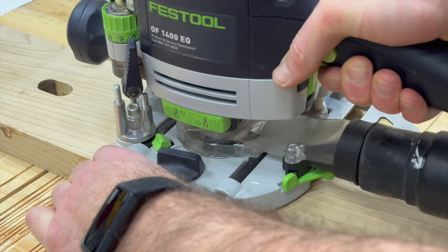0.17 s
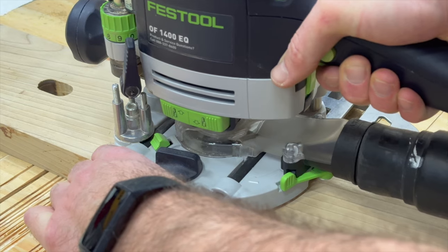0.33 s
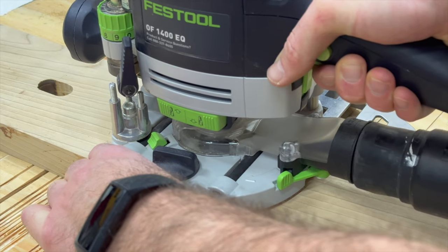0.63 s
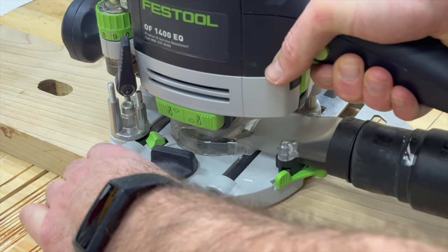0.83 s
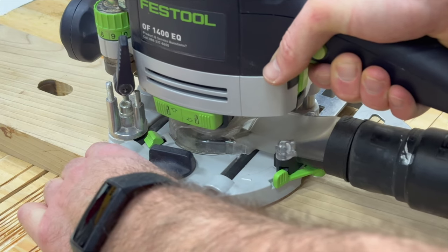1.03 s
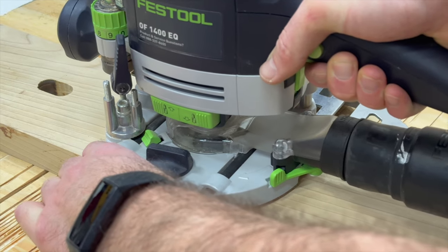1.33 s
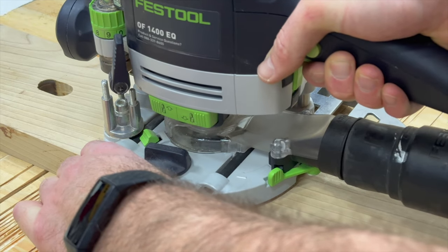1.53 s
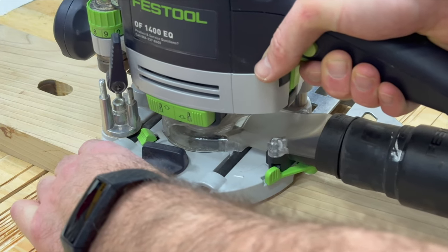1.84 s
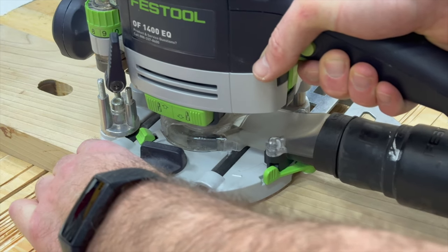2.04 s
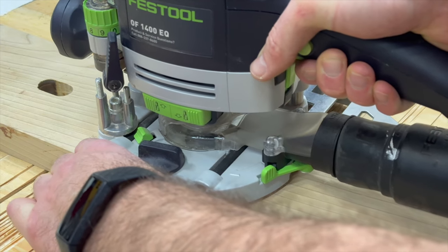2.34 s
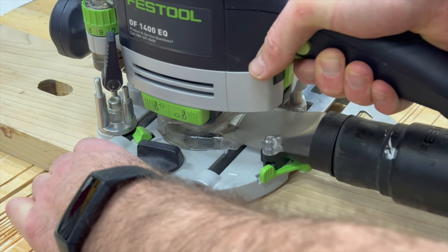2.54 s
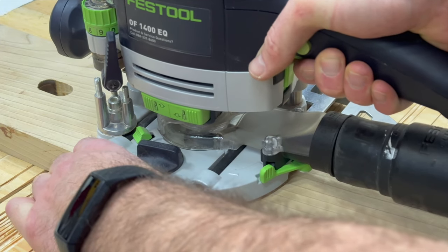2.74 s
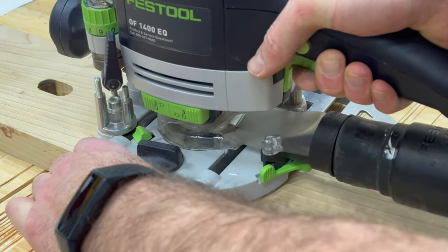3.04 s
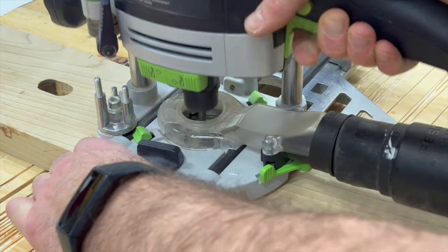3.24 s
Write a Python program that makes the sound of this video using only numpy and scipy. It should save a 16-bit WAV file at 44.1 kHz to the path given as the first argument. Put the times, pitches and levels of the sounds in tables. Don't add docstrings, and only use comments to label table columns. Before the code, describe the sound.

Router bit whines shrilly through wood over airy dust suction, falters, clears and coasts down

```python
import sys
import numpy as np
from scipy import signal
from scipy.fft import rfft, irfft
from scipy.io import wavfile
from scipy.ndimage import uniform_filter1d

SR = 44100
rng = np.random.default_rng(int(sys.argv[2]) if len(sys.argv) > 2 else 0)


def convert_level_to_amplitude(level_db):
    exponent = np.asarray(level_db, float) / 20
    return 10 ** exponent


def wrap_up_sound(samples):
    columns = np.atleast_2d(samples).T
    tamed = np.clip(columns, -1, 1)
    steps = np.round(tamed * 32767).astype(np.int16)
    wavfile.write(sys.argv[1], SR, steps)


N = 149940
T = np.arange(N) / SR
SWITCH_OFF_S = 2.93

# (time [s], pitch [Hz], level [dB])
STEADY_FEED = [(0, 2141, -34.5), (.1, 2131.5, -33), (.4, 2132, -31), (.56, 2125, -31), (.7, 2126, -32),
               (.85, 2131, -31.5), (1.0, 2136, -32), (1.09, 2124, -31), (1.25, 2127, -32.5),
               (1.36, 2128, -32), (1.62, 2127.6, -32.5), (1.8, 2131, -32.5), (2.07, 2128.6, -33)]
# (time [s], pitch [Hz], level [dB])
SLOT_END = [
    (2.135, 2128, -32),
    (2.188, 2129, -29),
    (2.226, 2127, -30),
    (2.262, 2128, -32),
    (2.292, 2129, -35.5),
    (2.305, 2129, -33.5),
    (2.33, 2129, -34),
    (2.385, 2126, -31),
    (2.468, 2128, -31.3),
]
# (time [s], depth [dB], sink time [s], regrowth time [s])
FALTERS = [(2.121, 5, .016, .006), (2.171, 21, .019, .009), (2.211, 11, .013, .008), (2.252, 9, .02, .005),
           (.86, 2, .01, .01), (.91, 2, .01, .01), (1.645, 2, .012, .012), (1.75, 3, .012, .012)]
CHATTER_ORDERS = [(1, 0), (1, 1), (1, -1), (1, 2), (1, 4.13), (2, 0), (2, -1), (2, 1), (2, 4.13), (3, 0),
                  (3, -1), (3, 1), (3, 2), (3, 3), (3, 4.012), (4, 0), (5, 0), (6, 0), (4, 4.02), (7, 0),
                  (2, 2), (2, 3), (3, 5), (4, 5), (5, 1), (5, 2), (5, 4), (5, 6)]
CHATTER_DB = [0, -16, -29, -30, -26.5, -16, -26, -32, -35, -12.5, -32, -23, -35, -32, -25.5, -20.5, -23,
              -35, -33, -36, -30, -36, -35, -35, -36, -35, -37, -34]
# (time [s], rotation [turns/s])
SPINDLE = [
    (0, 364.5),
    (2.45, 364.3),
    (2.6, 365.6),
    (2.96, 365),
    (3.11, 352),
    (3.25, 341),
    (3.4, 333),
]
SPINDLE_ORDERS = [1, 2, 4, 4.13, 6, 12]
LOADED_DB = [-61, -64, -67, -63, -62, -72]
FREE_DB = [-58, -55.5, -66, -63, -72, -69]
COAST_DB = [-55, -68, -67, -72, -76, -75]
# (frequency [Hz], level [dB])
ROAR = [(25, -58), (110, -17.5), (300, -10), (900, -1), (3000, -3.5), (5000, -7.5), (9000, -5.5),
        (16000, -15)]
# (frequency [Hz], width [Hz], level [dB])
ROAR_BUMPS = [(6370, 165, 5), (6530, 230, 3), (118, 8.6, 2.5), (1510, 320, -3.5), (4530, 410, -2),
              (8600, 230, 2)]
# (frequency [Hz], level [dB])
HISS = [(200, -27), (800, -1), (1500, -4), (2200, -9.5), (3500, -3.5), (5000, -3.5), (8000, 0), (16000, -9)]
# (time [s], level [dB])
CLIMB = [
    (2.5, -57),
    (2.69, -53),
    (2.74, -66),
    (2.86, -63),
    (2.95, -51),
    (3.02, -54),
    (3.12, -63),
    (3.25, -74),
]
# (frequency [Hz], level [dB])
GRAZE_RING = [(2160, 0), (2480, -5), (2620, -9)]
# (frequency [Hz], likeness [0-1])
LIKENESS = [(250, 1.0), (500, 0.95), (1500, 1), (6000, 1), (9000, 0.47), (11000, 0.84), (11600, 0.99),
            (16000, 1)]
# (frequency [Hz], phase
CHANNEL_PHASE = [(60, .04), (250, 0.09), (520, 0.43), (1300, 0.22), (1800, 0), (4400, 0.18), (6500, 0),
                 (7750, 0.86)]
CHANNEL_PHASE_TOP = [(10700, 2.14), (11200, 3.3), (11500, 3.14), (14600, 3.15), (15100, 3.9), (16000, 4)]


def evened(x):
    return x / np.sqrt(np.mean(x ** 2) + 1e-20)


def read(points, hz):
    f, value = np.transpose(points)
    return np.interp(np.log(hz + 1), np.log(f + 1), value)


def drift(rate_hz):
    hz = np.fft.rfftfreq(4096, 40 / SR)
    spectrum = rfft(rng.standard_normal(4096)) / (1 + (hz / rate_hz) ** 2)
    return np.interp(T, np.arange(4096) * 40 / SR, evened(irfft(spectrum)))


def noise(points, bumps, patchy_db):
    frames, hz = N // 256 + 5, np.fft.rfftfreq(1024, 1 / SR)
    real, imag, patches = rng.standard_normal((frames, 513, 3)).T
    patches = uniform_filter1d(patches, size=10, axis=0)
    patches = evened(uniform_filter1d(patches, size=12, axis=1))
    colour = read(points, hz)
    for f, width, db in bumps:
        colour = colour + db * np.exp(-((hz - f) / width) ** 2)
    spectrum = (real + 1j * imag) * convert_level_to_amplitude(colour[:, None] + patchy_db * patches)
    return evened(signal.istft(spectrum, nperseg=1024, noverlap=768)[1][:N])


def bite():
    s, hz, db = np.transpose(list(STEADY_FEED) + list(SLOT_END))
    level = np.interp(T, s, db)
    for at, depth_db, sink, regrow in FALTERS:
        level = level - depth_db * np.exp(-((T - at) / np.where(T < at, sink, regrow)) ** 2)
    after = np.maximum(T - s[-1], 0)
    lift = -1300 * after
    linger = -24 - 90 * after
    return np.interp(T, s, hz), level, lift, linger


def chatter(turns, hz, level, lift, linger):
    wobble_hz, flutter_db, waver_db, steepen = 1.0, .3, .6, .15
    cycle = 2 * np.pi * np.cumsum(hz + wobble_hz * drift(30)) / SR
    level = level + flutter_db * drift(30)
    partials = np.zeros(N)
    for (k, m), db in zip(CHATTER_ORDERS, CHATTER_DB):
        extra = steepen * (k - 1) * (level + lift + 39.5)
        extra = extra + waver_db * min(k - 1 + abs(m), 2) * drift(14)
        partials += convert_level_to_amplitude(db + level + lift + extra) * np.cos(k * cycle + m * turns + 7 * rng.random())
    skirt = drift(70) * np.cos(cycle) + drift(70) * np.sin(cycle)
    ring_db = level + np.minimum(linger, lift * -9 - 60)
    ring = convert_level_to_amplitude(ring_db) * (1 + .5 * drift(13)) * np.cos(cycle)
    return np.sqrt(2) * (partials + ring) + convert_level_to_amplitude(-22 + level + lift) * skirt


def motor(turns, speed, cutting):
    housing_hz, housing_width_hz, housing_db = 1375, 16, 15
    coast = np.clip((T - SWITCH_OFF_S) / 0.16, 0, 1)
    fade_db = -85 * np.maximum(T - 3.29, 0)
    out = np.zeros(N)
    for m, load_db, free_db, coast_db in zip(SPINDLE_ORDERS, LOADED_DB, FREE_DB, COAST_DB):
        db = cutting * load_db + (1 - cutting) * (free_db + coast * (coast_db - free_db))
        db = db + housing_db * np.exp(-((m * speed - housing_hz) / housing_width_hz) ** 2 / 2)
        db = db + 0.46 * drift(27)
        out += convert_level_to_amplitude(db + fade_db) * np.cos(m * turns + 7 * rng.random())
    return np.sqrt(2) * out


def air(turns, level, lift):
    off = np.maximum(T - SWITCH_OFF_S, 0)
    roar = noise(ROAR, ROAR_BUMPS, patchy_db=0.74)
    top = signal.sosfilt(signal.butter(2, 3500, "high", fs=SR, output="sos"), roar)
    duller = roar - top * np.minimum(0.2 * off, 1)
    roar = convert_level_to_amplitude(-43.5 - 4 * off) * duller
    stripes = 1 + 0.19 * np.cos(turns)
    hiss = noise(HISS, [(5900, 1500, -1), (4980, 52, -11)], patchy_db=1.5) * stripes
    follow_db = 0.42 * uniform_filter1d(level + 32, size=900)
    return roar + convert_level_to_amplitude(-43 + follow_db + lift) * hiss


def free_bit(turns, cutting):
    level = np.interp(T, *np.transpose(CLIMB)) + 0.46 * drift(9.7)
    return np.sqrt(2) * (1 - cutting) * convert_level_to_amplitude(level) * np.cos(SPINDLE_ORDERS[4] * turns)


def graze():
    at_s, length_s, level_db = 2.806, .007, -41
    shape = np.exp(-((T - at_s) / length_s) ** 2)
    return shape * sum(convert_level_to_amplitude(level_db + db) * np.cos(2 * np.pi * hz * T) for hz, db in GRAZE_RING)


def scene():
    speed = np.interp(T, *np.transpose(SPINDLE))
    turns = 2 * np.pi * np.cumsum(speed + 0.29 * drift(6.5)) / SR
    hz, level, lift, linger = bite()
    cutting = convert_level_to_amplitude(lift)
    tones = chatter(turns, hz, level, lift, linger) + motor(turns, speed, cutting)
    tones = tones + free_bit(turns, cutting) + graze()
    near = rfft(air(turns, level, lift))
    walls = rfft(air(turns, level, lift))
    same = np.clip(read(LIKENESS, np.fft.rfftfreq(N, 1 / SR)), 0, 1)
    both, apart = np.sqrt((1 + same) / 2) * near, np.sqrt((1 - same) / 2) * walls
    return tones + irfft(np.array([both + apart, both - apart]), N)


def top_cut(x):
    return signal.sosfilt(signal.butter(12, 16740, fs=SR, output="sos"), x)


def record(dry):
    notch_hz, notch_width_hz, notch_rad = 4990, 82, 2.3
    hz = np.fft.rfftfreq(N, 1 / SR)
    lag = read(list(CHANNEL_PHASE) + list(CHANNEL_PHASE_TOP), hz) * np.where(hz > 2500, -1, 1)
    lag = lag - notch_rad * np.exp(-((hz - notch_hz) / notch_width_hz) ** 2)
    turn = np.exp(.5j * np.array([lag, -lag]))
    ports = irfft(rfft(dry) * turn * (hz < 15790), N)
    return top_cut(ports)


dry = scene()
out = record(dry)
wrap_up_sound(out)
```